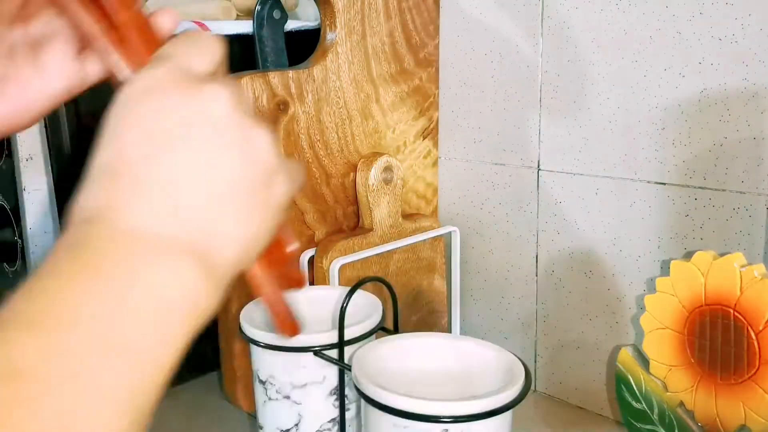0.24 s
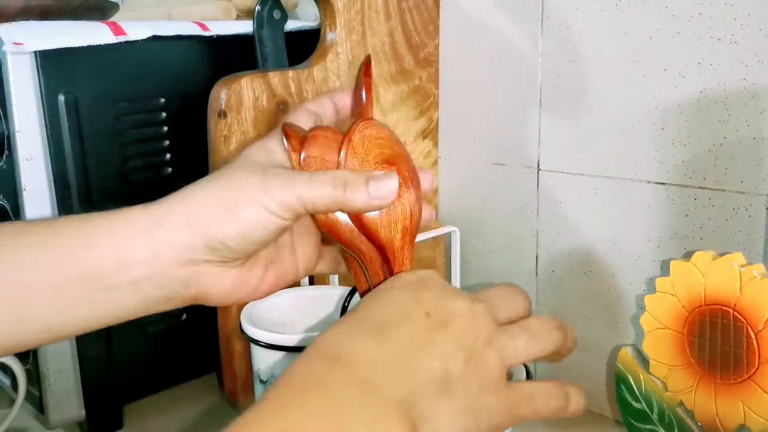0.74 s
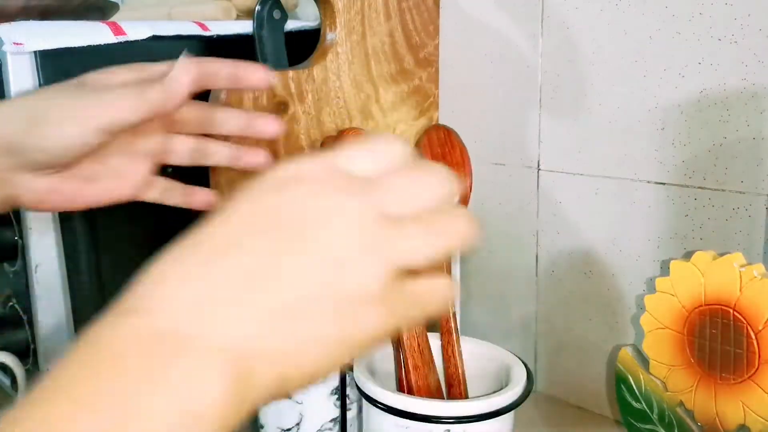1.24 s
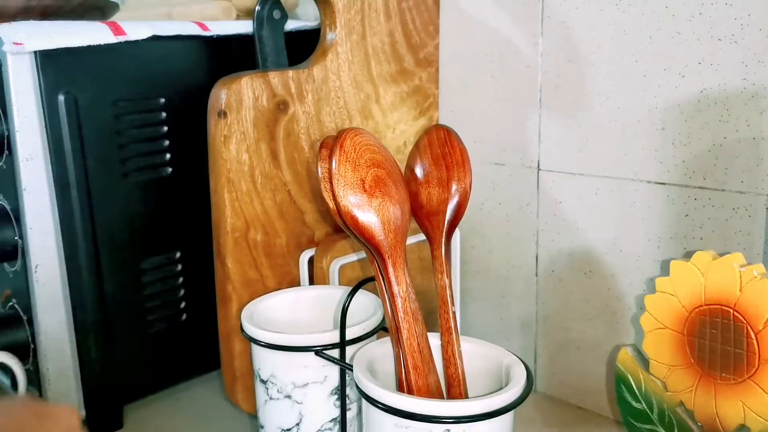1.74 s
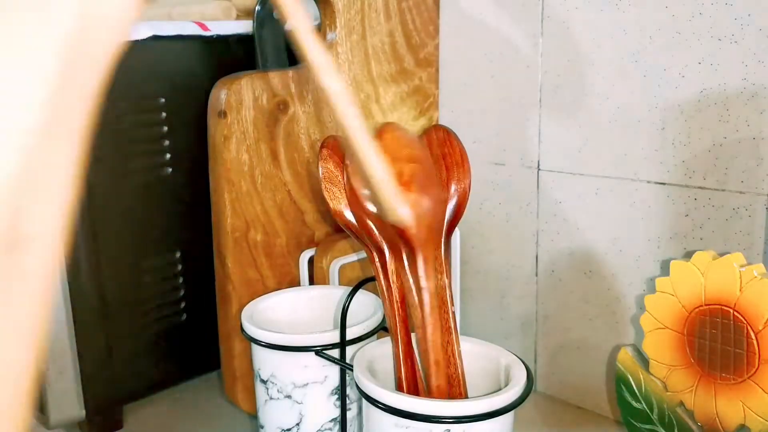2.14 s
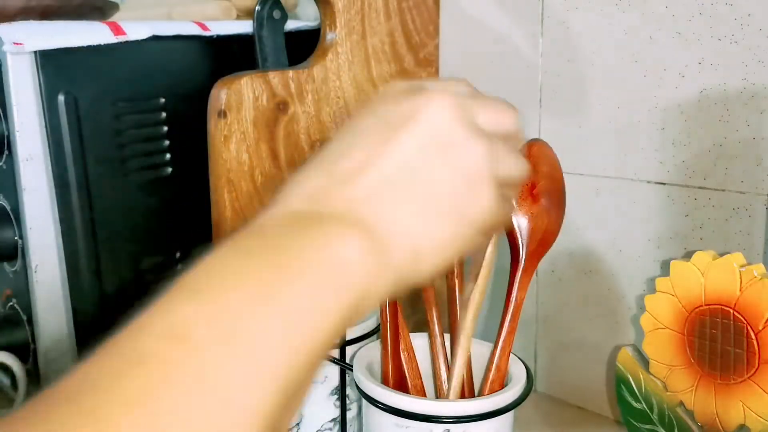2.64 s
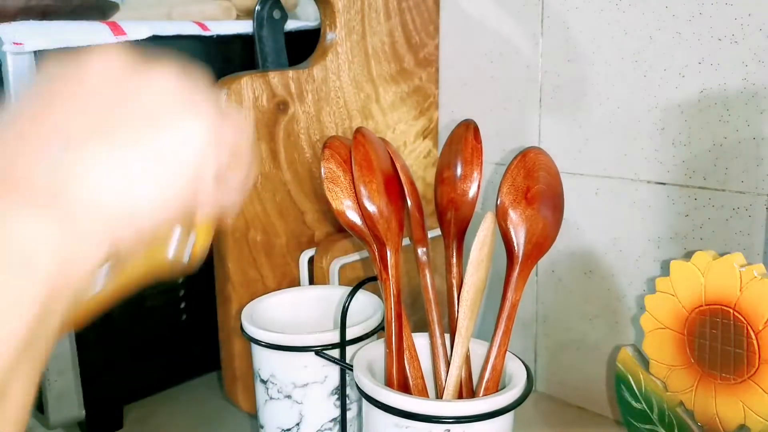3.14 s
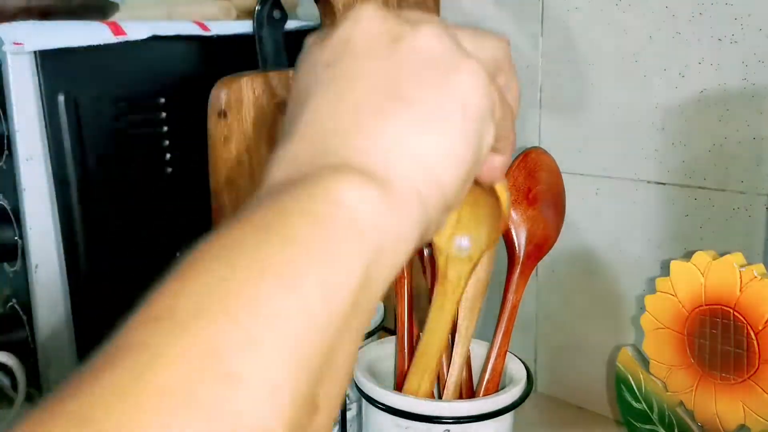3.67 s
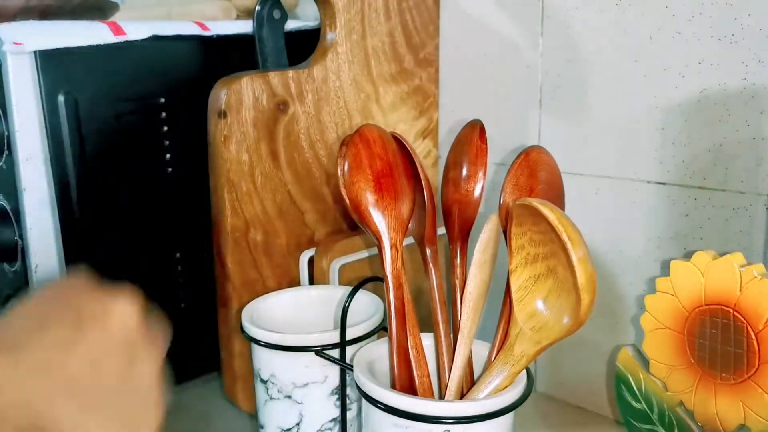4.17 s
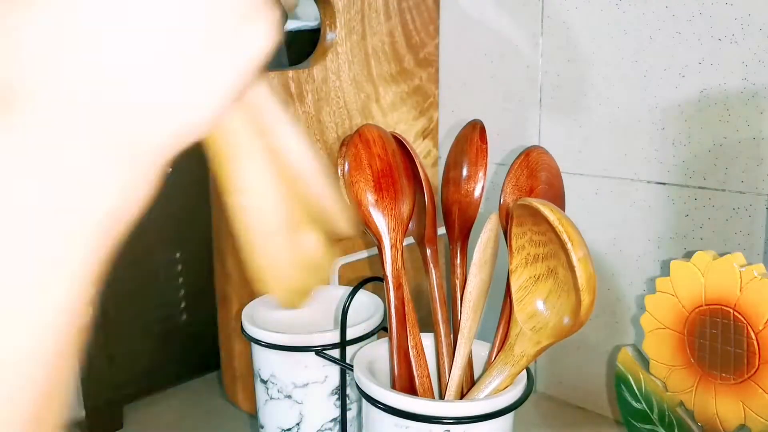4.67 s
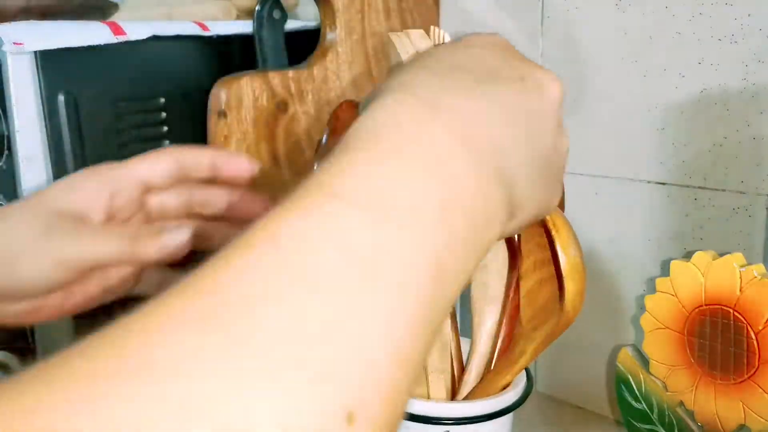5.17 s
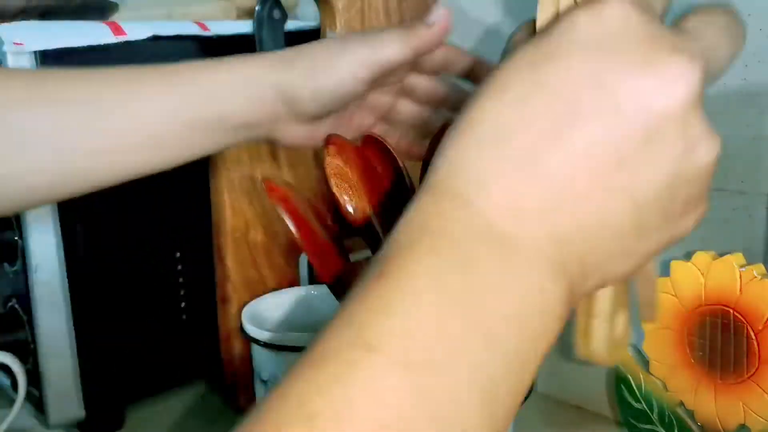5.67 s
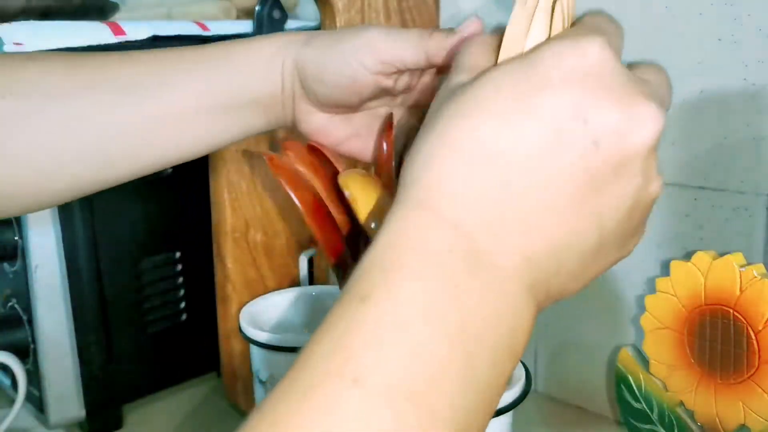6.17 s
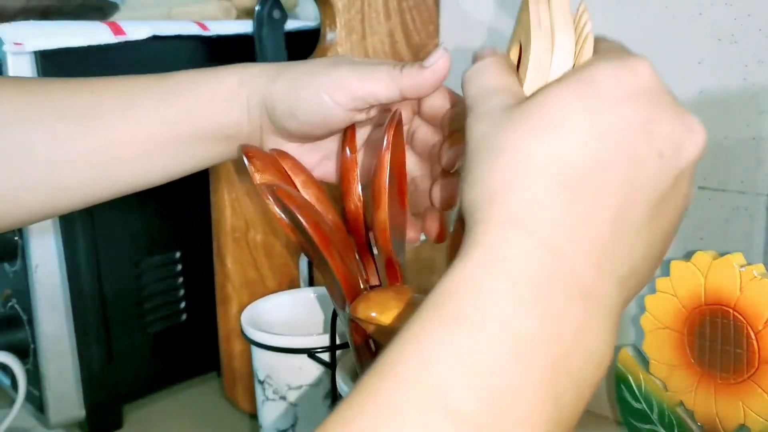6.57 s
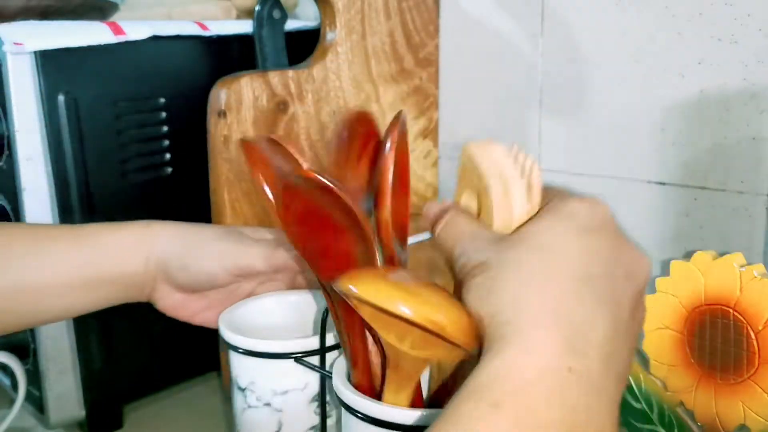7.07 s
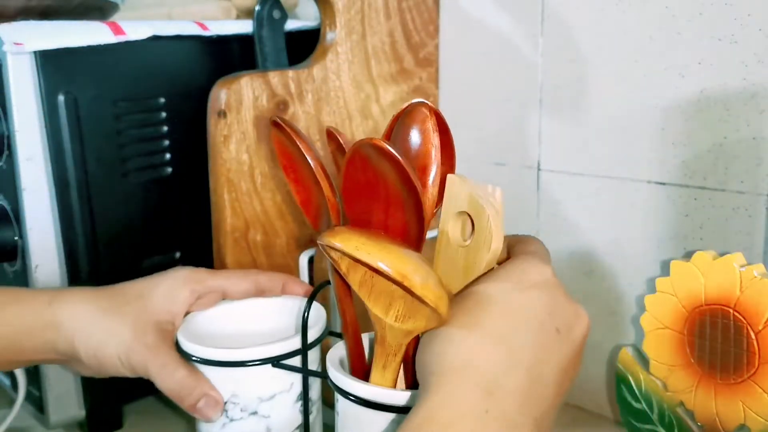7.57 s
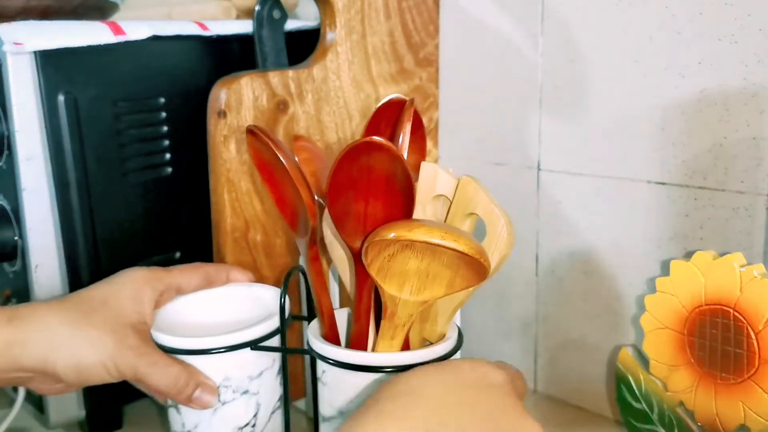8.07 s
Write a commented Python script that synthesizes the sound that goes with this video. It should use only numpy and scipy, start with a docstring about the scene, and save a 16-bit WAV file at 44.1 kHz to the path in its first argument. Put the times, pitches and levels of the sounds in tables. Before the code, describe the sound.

Wooden spoons and spatulas clack into a ceramic utensil cup, rattling, sliding and knocking together in a small kitchen over faint hum.

```python
"""Wooden utensils in a ceramic holder

Wooden spoons and spatulas are dropped into a ceramic holder on a kitchen counter and shuffled about.
Knocks are noise bursts and decaying modes: sticks clack, the counter thuds, the cup wall and hollow ring.
The wire stand pings as decaying sines; sliding, scrapes, a squeak and handling are shaped noise.
Noise echoes stand for a small hard-walled kitchen; room noise and steady sines give an appliance hum.
"""
import sys
import numpy as np
from scipy import signal
from scipy.fft import rfft, irfft, next_fast_len
from scipy.io import wavfile

SR = 44100
rng = np.random.default_rng(int(sys.argv[2]) if len(sys.argv) > 2 else 0)


def wav_out(sig):
    """Save sig, one row per channel (or a flat mono array), as 16-bit PCM at SR to the path in sys.argv[1]."""
    wavfile.write(sys.argv[1], SR, np.round(np.clip(np.atleast_2d(sig).T, -1, 1) * 32767).astype(np.int16))


N = 366471
TIME = np.arange(N) / SR

# Handle knocks. Each row: start in seconds, clack level in dB, stick mode in Hz,
# share of that mode in the clack from 0 to 1, counter thud in dB, cup hollow in dB.
KNOCK_EVENTS = [(0.0095, -38, 2700, 0, -51.5, -57), (0.16, -39.5, 1300, 0.6, -52.0, -62.0),
                (0.213, -44.0, 2090, 0.4, -55, -54), (0.2611, -38.0, 1300, 0.4, -55, -49.0),
                (0.334, -27.5, 1190, 0.22, -28, -51.0), (0.347, -31, 3970, 0.13, -85, -59.0),
                (0.389, -43, 2260, 0.79, -75, -59), (0.622, -33.5, 2870, 0.54, -53, -60),
                (0.697, -28, 3980, 0.62, -58, -66.0), (0.737, -26, 3850, 0.83, -57, -30),
                (0.747, -27, 3890, 0.6, -79, -55), (0.765, -28.5, 4100, 0.9, -68, -66),
                (0.84, -35.5, 2820, 0.7, -67, -50), (0.876, -39.5, 2740, 0.7, -67.0, -44.5),
                (0.997, -24.5, 2597, 0.75, -44.5, -67.0), (1.016, -34.5, 3380, 0.6, -70.0, -60.0),
                (1.029, -29.5, 4450, 0.8, -68, -60), (1.041, -29.0, 2050, 0.45, -56, -36.0),
                (1.071, -29, 4050, 0.9, -54, -66.0), (1.081, -34.5, 2680, 0.7, -64, -54),
                (1.227, -29, 3950, 0.68, -55, -46), (1.739, -38.5, 2060, 0.03, -45, -44),
                (1.789, -24, 2260, 0, -55, -46), (1.821, -33, 2270, 0.16, -39, -55),
                (1.831, -30.5, 2200, 0.2, -40, -44), (1.864, -25.5, 2370, 0.3, -41, -65.0),
                (1.916, -29, 2180, 0.45, -46, -47), (2.066, -35.5, 2200, 0.63, -48, -55),
                (2.256, -28.5, 3950, 0.25, -84, -49), (2.323, -34.5, 4100, 0.3, -66, -53),
                (2.351, -33.5, 2590, 0.5, -59, -64.0), (2.461, -30, 2630, 0.6, -73.0, -39.5),
                (2.6, -34.5, 4160, 0.18, -50.0, -44.0), (2.657, -34, 2770, 0.7, -49, -53),
                (2.674, -33.5, 1566, 0.73, -57, -62.0), (2.748, -28.5, 3380, 0.3, -75, -36),
                (2.795, -31, 4070, 0.06, -50, -62.0), (2.839, -39, 2680, 0, -57, -50.0),
                (3.06, -39.0, 2220, 0.8, -40.5, -37.0), (3.086, -32, 2210, 0.37, -43.5, -49),
                (3.122, -25.5, 2086, 0.37, -47, -41), (3.597, -24.5, 2660, 0, -44.0, -39.5),
                (3.621, -28.5, 4700, 0, -53.0, -53), (3.666, -29.0, 2604, 0.86, -68, -73),
                (3.938, -28, 4750, 0.06, -47, -36), (4.035, -42, 4720, 0.3, -67, -43),
                (4.114, -42.5, 2120, 0.84, -44, -52), (4.203, -38.5, 1388, 0.6, -35.0, -61),
                (4.23, -32.0, 3500, 0.7, -87, -64.0), (4.25, -36.5, 4720, 0.4, -87, -43.5),
                (5.003, -38.5, 3260, 0.6, -61.0, -63), (5.031, -36, 2080, 0.2, -44.5, -34),
                (5.041, -30, 2610, 0.01, -45.5, -40), (5.151, -38, 2040, 0.7, -47, -42),
                (5.159, -30.5, 2770, 0.52, -46, -47), (5.169, -28.5, 2916, 1, -47, -45),
                (5.182, -32, 5600, 0.1, -52, -42), (5.212, -30.5, 2074, 0.7, -47, -52),
                (5.224, -34.0, 2140, 0.2, -55, -51), (5.238, -32, 4050, 0.6, -70.0, -43),
                (5.301, -27.5, 2716, 0.35, -42.5, -51), (5.354, -34, 4060, 1, -47, -67.0),
                (5.427, -36.5, 4270, 0.54, -56, -47.5), (5.508, -32.5, 2630, 0.66, -72, -45.5),
                (5.523, -23.5, 2850, 0.57, -45.5, -38), (5.827, -25.5, 4720, 0.51, -52, -54),
                (5.919, -31, 5140, 0.2, -59, -70.0), (5.945, -28, 2110, 0.16, -45, -46.5),
                (6.119, -37.5, 2145, 0.9, -48.5, -51), (6.141, -32.5, 6300, 0.37, -82, -46),
                (6.248, -40, 2440, 0.25, -52.0, -53), (6.286, -39, 2420, 0.73, -50, -49),
                (6.306, -33, 2430, 0.9, -62.0, -41), (6.327, -40, 2630, 0.35, -60, -37.5),
                (6.353, -27, 4640, 0.4, -57, -48), (6.394, -34.5, 2160, 0.5, -61, -42),
                (6.403, -29.5, 2160, 0.63, -67, -59), (6.456, -36.5, 2580, 0.24, -61.0, -60),
                (6.484, -31.5, 2480, 0.4, -39.5, -47.0), (6.514, -24, 2706, 0.99, -56, -45),
                (6.562, -38, 4050, 0.6, -70, -49.0), (6.618, -38, 2480, 0.3, -54, -49.0),
                (6.627, -34, 2300, 0.34, -54, -44), (6.682, -41.5, 2510, 0.7, -68.0, -44),
                (6.773, -41.5, 3450, 0.2, -95, -45.5), (6.93, -44.5, 2560, 1, -45, -41),
                (7.021, -39.5, 1930, 0.3, -48, -45), (7.031, -36, 2510, 0.12, -84, -44.5),
                (7.142, -34.5, 2660, 0.7, -51, -39), (7.161, -26.5, 2670, 0.46, -51, -36),
                (7.181, -25.5, 4520, 0.45, -57, -55.0), (7.218, -28.5, 2720, 0.2, -46, -58),
                (7.237, -32.5, 3990, 0.8, -81, -56), (7.271, -28.5, 2140, 0.5, -37.5, -23.5),
                (7.276, -34.5, 2640, 0.2, -55, -43), (7.284, -29, 2630, 0.4, -85, -61),
                (7.31, -30.5, 5120, 0.6, -65, -60), (7.37, -39, 2670, 0.83, -64.0, -49),
                (7.405, -37.0, 4650, 0.35, -77, -65.0), (7.469, -30, 2040, 0.53, -45.5, -37.0),
                (7.674, -38.5, 2640, 0.5, -101, -60), (7.821, -46, 2540, 1, -55, -48),
                (7.87, -31, 2420, 0.65, -51, -36), (7.909, -38.5, 2020, 0.7, -41.5, -40)]
# Air resonance of the cup, higher once it is crowded. Each row: time in seconds, pitch in Hz.
HOLLOW_PITCH = [(0, 793), (3.5, 870), (3.9, 912), (8.3, 942)]
# Ceramic wall, damped by the sticks inside.
# Each row: mode in Hz, relative level in dB, ring time in seconds before further damping.
WALL_MODES = [(1549, 3, 0.12), (2182, 10, 0.08), (2285, -8, 0.03), (2602, 19, 0.05), (2730, 3, 0.044),
              (3950, 7, 0.09), (4090, 3, 0.15), (4430, 7.5, 0.077), (4750, 13.5, 0.057), (6710, 5.5, 0.035)]
# Strikes on the wire stand, each spot with its own pitch. Each row: start in seconds, Hz, dB.
WIRE_STRIKES = [(6.14, 6740, -36), (7.031, 6780, -41), (7.236, 6780, -36), (7.274, 9560, -20),
                (7.292, 7460, -29), (7.407, 8150, -40)]
# Squeak of a polished handle. Each row: time in seconds, pitch in Hz, level in dB.
SQUEAK_CURVE = [(3.2, 4770, -86), (3.24, 4410, -40.5), (3.275, 3390, -42), (3.3, 3500, -52),
                (3.36, 3330, -69)]
# Place of the touching handles, right at first, then left. Each row: time in seconds, left minus right in dB.
PLACE_CURVE = [(.3, -1.5), (1, -3.5), (3, -2), (5.6, -3), (6.3, 1), (7.2, 3.5), (8, 2.5)]
# Fingers brushing along dry wood. Each row: middle in seconds, Gaussian half length in seconds, dB.
FINGER_SWISHES = [(1.469, 0.04, -60), (2.249, 0.025, -51.5), (4.587, 0.025, -52), (4.683, 0.013, -54),
                  (4.773, 0.015, -54.5), (4.881, 0.013, -49.5), (4.986, 0.013, -52.5)]
# Soft low rumble of an arm reaching or drawing back.
# Each row: middle in seconds, Gaussian half length in seconds, dB.
ARM_REACHES = [(0.105, 0.53, -68), (1.532, 0.092, -59), (1.83, 0.16, -59.5), (2.146, 0.065, -57),
               (3.07, 0.058, -57.5), (3.41, .13, -63), (4.811, 0.17, -70), (8.3, 0.38, -57.5)]
# Handle juddering on the cup bottom. One row: middle in seconds, Gaussian half length in seconds, dB, Hz.
HANDLE_JUDDER = (6.47, .015, -44, 245)
# Wood dragged in a short jerk. Each row: middle in seconds, Gaussian half length in seconds, Hz, dB.
WOOD_SCRAPES = [(0.044, 0.039, 1380, -43), (0.052, 0.014, 2380, -41), (0.292, 0.0085, 895, -46),
                (1.831, 0.018, 850, -39), (1.94, 0.0098, 570, -34.5), (2.007, 0.0087, 1150, -33),
                (2.073, 0.012, 740, -36.5), (2.714, 0.011, 505, -43), (4.184, 0.0055, 770, -38.5)]
# Handle pushed along its neighbours and the cup. Each row: time of full swell in seconds, hold in seconds,
# rub gain in dB, rumble gain in dB; sliding() trims both.
SLIDING_STROKES = [(-0.003, 0.03, -36, -50.5), (0.128, 0.23, -51, -52), (0.734, 0.07, -37, -53),
                   (0.885, 0.067, -47.5, -54.5), (1.04, 0.037, -43, -52.5), (1.735, 0.33, -53, -45.5),
                   (2.37, 0.013, -41.5, -50), (2.688, 0.14, -52, -51.5), (3.69, 0.21, -54.5, -58),
                   (4.099, 0.15, -47, -49.5), (5.12, 0.36, -53.5, -51.5), (5.919, 0.14, -51.5, -49),
                   (6.361, 0.15, -39.5, -44.5), (6.588, 0.18, -49.5, -51), (7.119, 0.34, -42.5, -48),
                   (7.676, 0.25, -55, -51.5)]
# Spells away from the cup, utensils gathered and picked up. Each row: start in seconds, end in seconds.
FETCH_SPELLS = [(0, .5), (1.6, 2.2), (2.95, 3.3)]
# Spectrum of two sticks clacking. Each row: frequency in Hz, relative density in dB per Hz.
CLACK_COLOUR = [(700, -6.5), (1100, 2.5), (1600, 7), (2600, 9.5), (4200, 9), (5600, -9), (8000, -18.5),
                (14000, -68)]
# Spectrum of the bright edge tick. Each row: frequency in Hz, relative density in dB per Hz.
TICK_COLOUR = [(3500, -1.5), (5500, 0.5), (7200, 0.5), (9000, -7.5), (11000, -9.5), (13000, -19.5),
               (16000, -87)]
# Spectrum of the counter thud. Each row: frequency in Hz, relative density in dB per Hz.
THUD_COLOUR = [(60, -34), (150, -9.5), (300, -12), (450, -8.5), (580, 0), (720, -6.5), (1200, -5.5)]
# Spectrum driving the cup hollow. Each row: frequency in Hz, relative density in dB per Hz.
BODY_COLOUR = [(400, -47), (650, -5.5), (900, 2), (1250, -10.5), (1900, -13.5)]
# Spectrum of rubbing wood. Each row: frequency in Hz, relative density in dB per Hz.
RUB_COLOUR = [(900, -59), (1500, -0.5), (2600, 7.5), (4400, 6), (6000, -2.5), (10000, -3), (13000, -18),
              (16000, -45)]
# Spectrum of finger swishes. Each row: frequency in Hz, relative density in dB per Hz.
SWISH_COLOUR = [(1500, -24), (3000, -15.5), (4400, -6.5), (5500, -19.5), (8000, -30.5), (13000, -40)]
# Spectrum of the room air. Each row: frequency in Hz, relative density in dB per Hz.
ROOM_COLOUR = [(25, 2), (45, -3.5), (79, -6.5), (129, -11.5), (250, -2.5), (310, -5.5), (375, -0.5),
               (440, -21), (620, -4.5), (950, -12.5), (1620, -16.5), (4600, -18.5), (8300, -32.5),
               (12200, -30), (15500, -49)]
# Appliance hum; the two close lines beat. Each row: frequency in Hz, level in dB.
HUM_LINES = [(123.8, -73.5), (358.5, -75), (376.8, -67.5), (446, -77)]
# Stereo likeness of noise. Each row: frequency in Hz, left-right correlation.
STEREO_LIKENESS = [(100, 0.69), (650, 0.65), (1100, 0.11), (2500, 0.0038), (12000, 0.062)]
# Kitchen decay. Each row: frequency in Hz, time to fall 60 dB in seconds.
KITCHEN_DECAY = [(200, 0.19), (600, 0.3), (1500, 0.25), (4000, 0.35), (9000, 0.26), (15000, 0.24)]
# Spectra of cup rumble, arm rumble and scrape grain. Each row: frequency in Hz, relative dB per Hz.
RUMBLE_COLOUR = [(200, -9.0), (450, -2.5), (800, 0.0), (1300, -3.0), (2000, -12)]
ARM_COLOUR = [(30, 0.0), (80, -1.5), (140, 6.5), (220, -11.0), (400, -6.0)]
GRAIN_COLOUR = [(300, 0), (3000, 0)]

ATTACK_S, CUTOFF_HZ = .012, 15900
ROOM_TONE_DB, ARM_REST_DB = -60, -77
JUDDER_T60_S = .06
SCRAPE_WIDTH = 0.33  # bandwidth as a share of the pitch
STROKE_ATTACK_S, STROKE_RELEASE_DB_PER_S = 0.16, 207
RESTING_RUB_DB, RESTING_RUMBLE_DB = -68, -88  # the bundle between strokes, before the trims of sliding()
TAPS_PER_S, TAP_RISE_S = 70, .0004
WIRE_RISE_S, WIRE_T60_S = .008, .06
# Wood is heavily damped; ring time holds at the reference and falls with this power of the pitch.
STICK_T60_S, STICK_REFERENCE_HZ, STICK_T60_POWER = .048, 2600, 0.34
# Tick level on a medium knock, and its growth in dB per dB of clack.
MEDIUM_KNOCK_DB, TICK_DB, TICK_GROWTH = -30, -32.5, 1.49
# A blunt end thuds more than this, re its clack, and loses tick in dB per dB.
BLUNT_FROM_DB, BLUNT_DULLING = -50, 0.18
RINGING_DULLS_DB = 4.5  # tick loss when the clack is all stick mode
FLAT_TICK_DB, FLAT_CUP_DB = -7.5, -31  # away from the cup: change of tick and of cup ring
# A handle drives wall modes near its pitch; reach is a share of the pitch, damping a share of ring time.
SYMPATHY_DB, SYMPATHY_REACH, SYMPATHY_DAMPING = 10, .03, 0.33
LONGEST_RING_S, FRAY_HZ = .13, 22  # leaning sticks buzz and fray each mode to this width
WALL_DETUNING, HOLLOW_DETUNING = .012, .02  # spread per knock, share of the pitch


def from_db(db):
    """Decibels to gain."""
    return np.exp(np.asarray(db) * (np.log(10) / 20))


def rms_one(x):
    """Scale to unit rms."""
    return x / np.sqrt(np.mean(x ** 2) + 1e-20)


def attack_one(x):
    """Scale a blow to unit rms over its attack."""
    return x / np.sqrt(np.mean(x[..., :int(ATTACK_S * SR)] ** 2) + 1e-20)


def at_time(curve, s):
    """Read a two-column curve at a time."""
    return np.interp(s, *np.transpose(curve))


def at_hz(points, hz):
    """Read a table on a log-frequency axis."""
    table_hz, values = np.transpose(points)
    return np.interp(np.log(np.maximum(hz, 1)), np.log(table_hz), values)


def add(out, s, sound):
    """Mix a sound in at a given time."""
    start = int(s * SR)
    out[:, start:start + sound.shape[-1]] += sound[:, :N - start]


def ring(x, hz, t60_s):
    """Two-pole resonator: a unit click rings a decaying cosine of height 1."""
    radius, turn = from_db(-60 / (t60_s * SR)), 2 * np.pi * hz / SR
    feedback = [1, -2 * radius * np.cos(turn), radius * radius]
    return signal.lfilter([1, -radius * np.cos(turn)], feedback, x + 1e-18)


def decaying_modes(hz, t60_s, t):
    """Complex tones that fall 60 dB in their ring time."""
    return np.exp(np.outer(2j * np.pi * hz - np.log(1000) / t60_s, t))


def spread_modes(strength, modes):
    """Sum ringing modes; each reaches the two channels a quarter turn apart."""
    quarter = np.outer([0, 1], rng.choice([-1, 1], len(modes))) / 4
    turns = rng.random(len(modes)) + quarter
    return ((strength * np.exp(2j * np.pi * turns)) @ modes).imag


def filtered_noise(sos, size):
    """Independent white noise in two channels, through a filter."""
    return signal.sosfilt(sos, rng.standard_normal((2, size)))


def coloured(spectrum, drive=1):
    """Unit-rms stereo noise of a given colour, its channels most alike in the bass."""
    hz = np.linspace(0, SR / 2, next_fast_len(N) // 2 + 1)
    mid, side = rfft(rng.standard_normal((2, N)) * drive, 2 * (len(hz) - 1))
    alike = np.clip(at_hz(STEREO_LIKENESS, hz), -1, 1)
    pair = np.sqrt(1 + alike) * mid + np.sqrt(1 - alike) * side * [[1], [-1]]
    low_skirt = np.minimum(hz / spectrum[0][0], 1) ** 2
    high_skirt = np.maximum(hz / spectrum[-1][0], 1) ** -2.0
    gain = low_skirt * high_skirt * from_db(at_hz(spectrum, hz))
    return rms_one(irfft(pair * gain)[:, :N])


def swell(middle_s, half_s):
    """A Gaussian stroke that comes and goes."""
    return np.exp(-.5 * ((TIME - middle_s) / half_s) ** 2)


def slips(per_s, spread_db, t60_s, smooth):
    """Force of a sliding contact: uneven little catches over steady friction."""
    heights = from_db(spread_db * np.minimum(rng.exponential(1, N), 3))
    catches = (rng.random(N) < per_s / SR) * heights
    return rms_one(ring(catches, 0, t60_s)) + smooth


def background():
    """Room air as coloured noise, and the steady sine lines of an appliance."""
    hum = 0
    for hz, level_db in HUM_LINES:
        hum = hum + from_db(level_db) * np.sqrt(2) * np.sin(2 * np.pi * (hz * TIME + rng.random()))
    return from_db(ROOM_TONE_DB) * coloured(ROOM_COLOUR) + hum


def kitchen(x, first_echo_s=0.00067, size=26000):
    """Dense wall echoes that die at their own rate in each octave."""
    t, tail = TIME[:size], 0
    edges_hz = np.geomspace(125, 16000, 8)
    for low_hz, high_hz in zip(edges_hz, edges_hz[1:]):
        band = filtered_noise(signal.butter(2, [low_hz, high_hz], "band", fs=SR, output="sos"), size)
        t60_s = at_hz(KITCHEN_DECAY, np.sqrt(low_hz * high_hz))
        tail = tail + band * np.exp(-np.log(1000) * t / t60_s)
    onset = np.minimum(t / first_echo_s, 1) ** 2
    tail = rms_one(tail * onset) / np.sqrt(size)
    return signal.fftconvolve(x, tail, axes=1)[:, :N]


def swishes():
    """Fingers brush dry wood: swells of coloured noise."""
    level = sum(from_db(db) * swell(s, half_s) for s, half_s, db in FINGER_SWISHES)
    return level * coloured(SWISH_COLOUR)


def arms():
    """Arm movements: low noise that swells over a faint floor."""
    level = sum(from_db(db) * swell(s, half_s) for s, half_s, db in ARM_REACHES)
    return (from_db(ARM_REST_DB) + level) * coloured(ARM_COLOUR)


def judder():
    """A dragged handle excites one low resonance with noise."""
    s, half_s, level_db, hz = HANDLE_JUDDER
    resonance = rms_one(ring(coloured([(hz, 0), (2 * hz, 0)]), hz, JUDDER_T60_S))
    return from_db(level_db) * swell(s, half_s) * resonance


def squeak(width_hz=330):
    """A short, rough whistle of friction, falling overall: a sine times slow noise."""
    s, curve_hz, curve_db = np.transpose(SQUEAK_CURVE)
    hz, level_db = np.interp(TIME, s, curve_hz), np.interp(TIME, s, curve_db)
    rough = rms_one(filtered_noise(signal.butter(2, width_hz, fs=SR, output="sos"), N))
    sounding = (TIME > s[0]) & (TIME < s[-1])
    whistle = np.sqrt(2) * np.sin(2 * np.pi * np.cumsum(hz) / SR)
    return sounding * from_db(level_db) * rough * whistle


def scrapes():
    """Each jerk is a grainy groan: uneven friction through a broad resonance."""
    out, t = np.zeros((2, N)), TIME[:SR // 6]
    grain = coloured(GRAIN_COLOUR, slips(per_s=110, spread_db=1.5, t60_s=0.009, smooth=0.84))
    for s, half_s, hz, level_db in WOOD_SCRAPES:
        start_s = max(s - len(t) / SR / 2, 0)
        piece = grain[:, int(start_s * SR):][:, :len(t)]
        groan = rms_one(ring(piece, hz, np.log(1000) / (np.pi * SCRAPE_WIDTH * hz)))
        shape = np.exp(-.5 * ((start_s + t - s) / half_s) ** 2)
        add(out, start_s, from_db(level_db) * groan * shape)
    return out


def stroke_levels():
    """Each stroke swells, holds and dies away: gains of the rub and of the cup's rumble."""
    rub, rumble = from_db(RESTING_RUB_DB), from_db(RESTING_RUMBLE_DB)
    for s, hold_s, rub_db, rumble_db in SLIDING_STROKES:
        attack = np.clip((TIME - s) / STROKE_ATTACK_S + 1, 0, 1) ** 2
        shape = attack * from_db(-STROKE_RELEASE_DB_PER_S * np.clip(TIME - s - hold_s, 0, 1))
        rub = np.maximum(rub, from_db(rub_db) * shape)
        rumble = np.maximum(rumble, from_db(rumble_db) * shape)
    return rub, rumble


def light_taps(t60_s=0.036, spread_db=4, low_hz=1300, high_hz=6500, count=5):
    """Loose handles touch one after another; each touch rings a few short-lived modes of its own."""
    out, t = np.zeros((2, N)), TIME[:SR // 25]
    for s in np.arange(0, TIME[-1] - 1 / TAPS_PER_S, 1 / TAPS_PER_S):
        hz = low_hz * (high_hz / low_hz) ** rng.random(count)
        strength = from_db(at_hz(RUB_COLOUR, hz)) * np.exp(2j * np.pi * rng.random((2, count)))
        touch = (strength @ decaying_modes(hz, t60_s, t)).imag
        tap = rms_one(touch * np.minimum(t / TAP_RISE_S, 1))
        add(out, s + rng.random() / TAPS_PER_S, from_db(spread_db * rng.uniform(-1.1, 1)) * tap)
    return rms_one(out)


def sliding(rub_db=-5, rumble_db=-2, wall_db=-10, hollow_db=-5, hollow_t60_s=0.11, taps_db=-1):
    """Rubbing wood hisses in grains, taps lightly and keeps the cup's wall and air sounding."""
    rub_gain, rumble_gain = stroke_levels()
    rub = coloured(RUB_COLOUR, slips(per_s=83, spread_db=5.0, t60_s=0.22, smooth=0.49))
    # the heavy cup evens out the catches
    rumble = coloured(RUMBLE_COLOUR, slips(per_s=230, spread_db=-0.5, t60_s=0.03, smooth=0.24))
    wall = rms_one(sum(from_db(db) * ring(rub, hz, t60_s / 2) for hz, db, t60_s in WALL_MODES))
    # the hollow rises in pitch as the cup fills
    crowded = np.interp(TIME, [HOLLOW_PITCH[1][0], HOLLOW_PITCH[2][0]], [0, 1])
    empty_air = ring(rumble, HOLLOW_PITCH[0][1], hollow_t60_s)
    full_air = ring(rumble, HOLLOW_PITCH[-1][1], hollow_t60_s)
    air = rms_one((1 - crowded) * empty_air + crowded * full_air)
    in_cup = ~np.any([(TIME >= start) & (TIME < end) for start, end in FETCH_SPELLS], axis=0)
    wood = from_db(rub_db) * (rub + from_db(wall_db) * wall) + from_db(taps_db) * light_taps()
    cup = from_db(rumble_db) * (rumble + from_db(hollow_db) * in_cup * air)
    return rub_gain * wood + rumble_gain * cup


def wire():
    """The steel stand gives thin, high sine pings that swell for a moment and decay."""
    out, t = np.zeros((2, N)), TIME[:SR // 4]
    shape = (1 - np.exp(-t / WIRE_RISE_S)) * np.exp(-np.log(1000) * t / WIRE_T60_S)
    for s, hz, level_db in WIRE_STRIKES:
        add(out, s, from_db(level_db) * shape * np.sin(2 * np.pi * hz * t)[None])
    return out


def burst(noise, s, t60_s, rise_s=0.0003, size=9000):
    """Crowded, heavily damped modes: noise that starts almost at once and dies."""
    t, start = TIME[:size], min(int(s * SR), N - size)
    shape = (1 - np.exp(-t / rise_s)) * from_db(-60 * t / t60_s)
    return attack_one(noise[:, start:start + size] * shape)


def bending(hz, t, weak_plane_db=-5, rise_s=0.0003):
    """An oval handle bends in two planes at slightly different pitches, one of them more strongly."""
    planes_hz = hz * (1 + rng.choice([-1, 1]) * np.array([-.01, .04]))
    t60_s = STICK_T60_S * (STICK_REFERENCE_HZ / hz) ** STICK_T60_POWER
    modes = decaying_modes(planes_hz, t60_s, t)
    return attack_one(spread_modes(from_db([0, weak_plane_db]), modes) * (1 - np.exp(-t / rise_s)))


def overtones(t, t60_s=0.049, count=11, low_hz=1400, high_hz=7500):
    """The two touching sticks ring briefly in a comb of unevenly spaced modes."""
    hz = low_hz * (high_hz / low_hz) ** ((np.arange(count) + rng.random(count)) / count)
    strength = from_db(at_hz(CLACK_COLOUR, hz)) * np.sqrt(hz)
    return attack_one(spread_modes(strength, decaying_modes(hz, t60_s, t)))


def stick_clack(clack, chatter, s, stick_hz, share, t):
    """One stick mode against a crack of noise and overtones; loose neighbours chatter after the blow."""
    crack = attack_one(burst(clack, s, t60_s=0.035) + from_db(1) * overtones(t))
    wood = attack_one(np.sqrt(share) * bending(stick_hz, t) + np.sqrt(1 - share) * crack)
    chatter_gain = from_db(-12 - 60 * t / 0.02)
    return wood + chatter_gain * chatter[:, int(s * SR):][:, :len(t)]


def cup_hollow(body, s, air_share=0.63):
    """A short contact rings the cup's air over a duller body of noise."""
    hz = at_time(HOLLOW_PITCH, s) * (1 + HOLLOW_DETUNING * rng.standard_normal())
    # another slice of the noise keeps the two parts unrelated
    air = attack_one(ring(burst(body, s + ATTACK_S, t60_s=0.026), hz, t60_s=0.026))
    return attack_one(np.sqrt(air_share) * air + np.sqrt(1 - air_share) * burst(body, s, t60_s=0.13))


def cup_wall(stick_hz, brightness_db, away_db, t, cup_db=-18, spread_db=7, rise_s=0.0046):
    """Ceramic modes, uneven at every spot, detuned and frayed by the leaning sticks."""
    hz, mode_db, t60_s = np.transpose(WALL_MODES)
    hz = hz * (1 + WALL_DETUNING * rng.standard_normal(len(hz)))
    # only a hard, bright contact reaches the high modes
    hardness_db = np.interp(hz, [3500, 6500], [0, min(brightness_db + 11.0, 6)])
    # modes near the handle's own pitch are driven harder and drained sooner
    near = np.exp(-.5 * (np.log(hz / stick_hz) / SYMPATHY_REACH) ** 2)
    t60_s = np.minimum(t60_s * (1 - SYMPATHY_DAMPING * near), LONGEST_RING_S)
    spot_db = spread_db * np.tanh(rng.standard_normal(len(hz)))
    strength = from_db(mode_db + hardness_db + SYMPATHY_DB * near + cup_db + away_db + spot_db)
    # each mode's phase wanders at random
    wander = np.cumsum(rng.standard_normal((len(hz), len(t))), axis=1)
    fray = np.exp(1j * wander * np.sqrt(2 * np.pi * FRAY_HZ / SR))
    modes = np.exp((2j * np.pi * hz - np.log(1000) / t60_s)[:, None] * t) * fray
    return spread_modes(strength, modes) * np.minimum(t / rise_s, 1)


def push(t):
    """The counter gives way once under a blunt end: a short, solid pulse."""
    band = signal.butter(2, [330, 1100], "band", fs=SR, output="sos")  # Hz
    return attack_one(signal.sosfilt(band, (t == 0) + 1e-18))


def tick_level(clack_db, thud_db):
    """Hard knocks tick strongly; thudding, blunt ones tick less."""
    blunt_db = max(thud_db - clack_db - BLUNT_FROM_DB, 0)
    return TICK_DB + TICK_GROWTH * (clack_db - MEDIUM_KNOCK_DB) - BLUNT_DULLING * blunt_db


def contact(s):
    """Utensils lying flat are damped: the change of tick (dB) and of the cup's ring (dB)."""
    if any(start < s < end for start, end in FETCH_SPELLS):
        return FLAT_TICK_DB, FLAT_CUP_DB
    return 0, 0


def knocks():
    """Each contact clacks the stick, thuds the counter and rings the cup's air and wall."""
    out, t = np.zeros((2, N)), TIME[:9000]
    clack, tick, thud, body = [coloured(c) for c in (CLACK_COLOUR, TICK_COLOUR, THUD_COLOUR, BODY_COLOUR)]
    chatter = coloured(CLACK_COLOUR, slips(per_s=270, spread_db=-14.0, t60_s=0.0072, smooth=0.049))
    for s, clack_db, stick_hz, share, thud_db, hollow_db in KNOCK_EVENTS:
        dull_db, away_db = contact(s)
        tick_db = tick_level(clack_db, thud_db) + dull_db - RINGING_DULLS_DB * share
        wood = stick_clack(clack, chatter, s, stick_hz, share, t)
        wall = cup_wall(stick_hz, tick_db - clack_db, away_db, t)
        counter = attack_one(burst(thud, s, t60_s=0.14) + push(t))
        blow = from_db(clack_db) * (wood + wall)
        blow += from_db(hollow_db) * cup_hollow(body, s)
        blow += from_db(thud_db) * counter
        blow += from_db(tick_db) * burst(tick, s, t60_s=0.071)
        pan_db = at_time(PLACE_CURVE, s)
        sides = rms_one(from_db(np.array([[pan_db], [-pan_db]]) / 2))
        add(out, s, blow * sides)
    return out


def scene(room_db=-7):
    """The utensils close by, the kitchen behind them."""
    handling = swishes() + arms() + judder()
    utensils = handling + squeak() + scrapes() + sliding() + wire() + knocks()
    return background() + from_db(room_db) * kitchen(utensils) + utensils


def record(dry):
    """The top is cut steeply."""
    return signal.sosfilt(signal.ellip(10, .2, 80, CUTOFF_HZ, fs=SR, output="sos"), dry)


dry = scene()
out = record(dry)
wav_out(out)
```